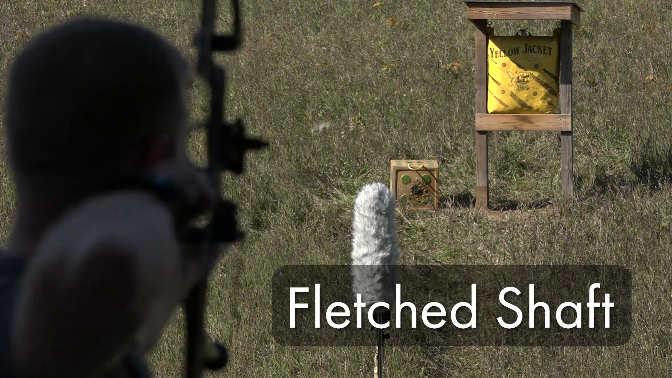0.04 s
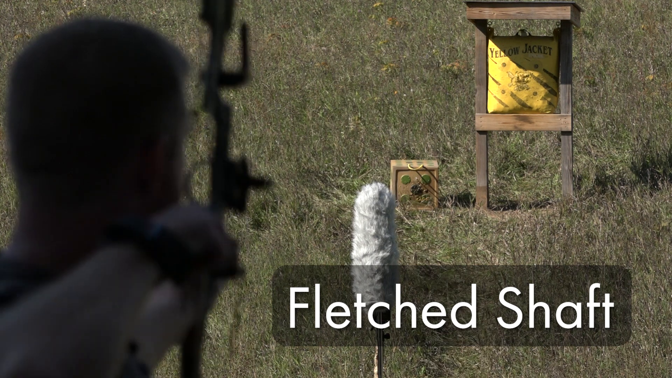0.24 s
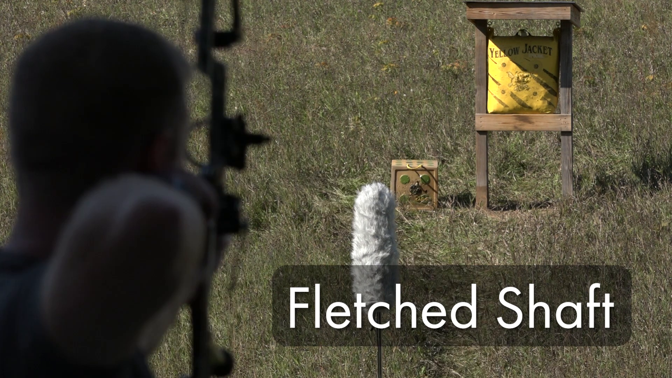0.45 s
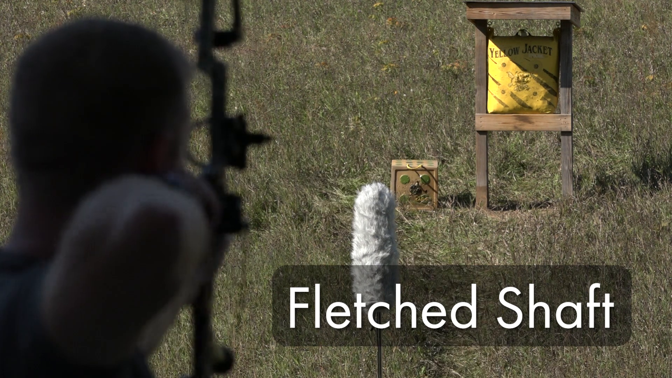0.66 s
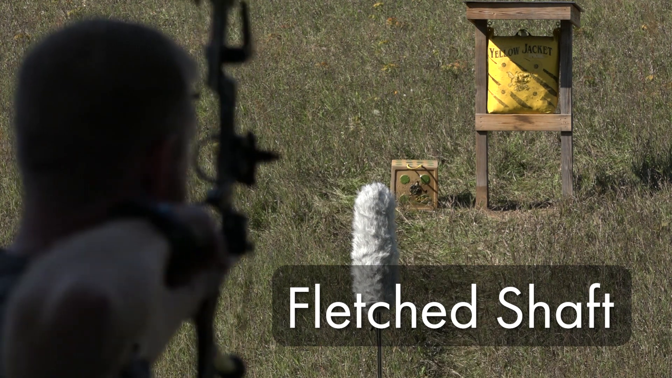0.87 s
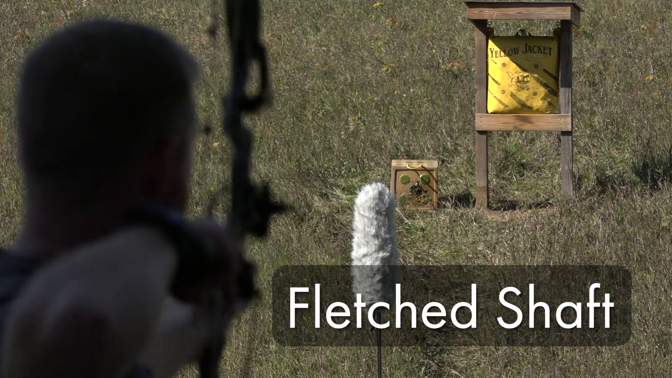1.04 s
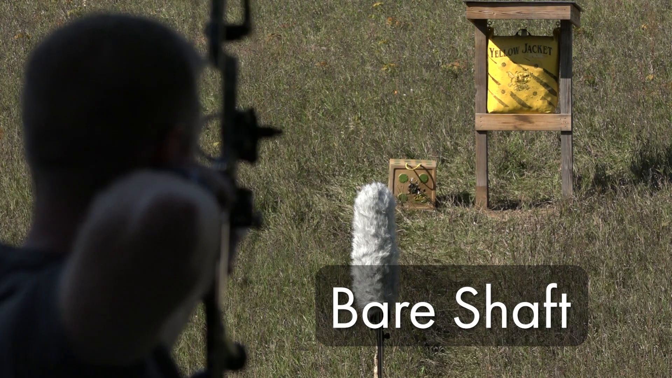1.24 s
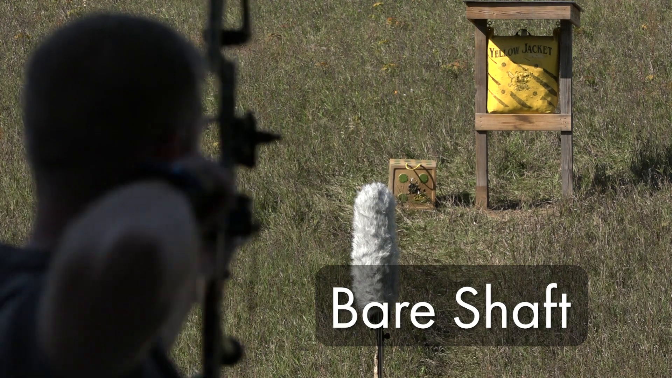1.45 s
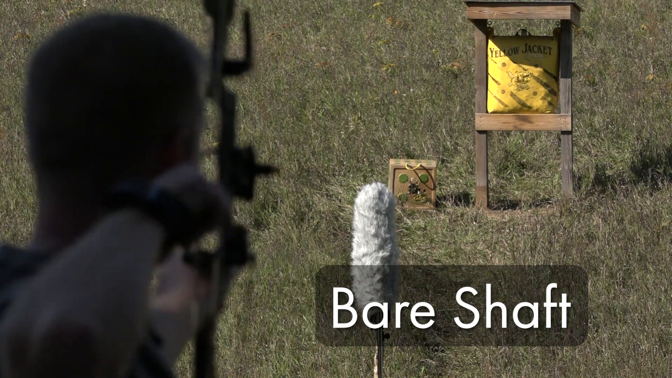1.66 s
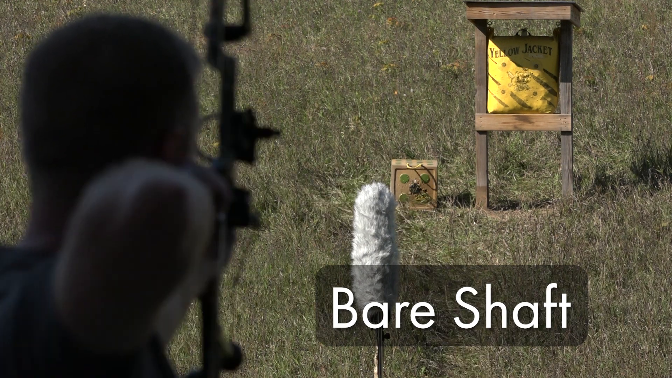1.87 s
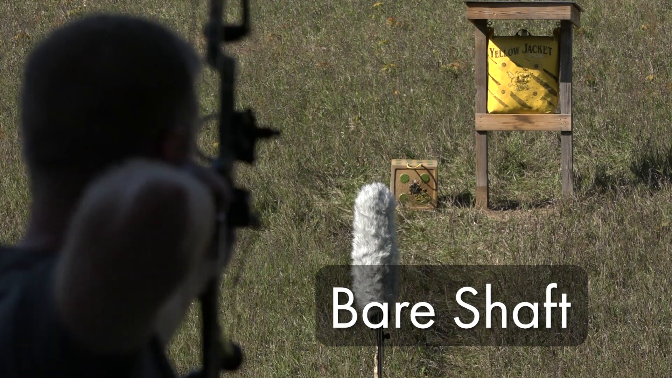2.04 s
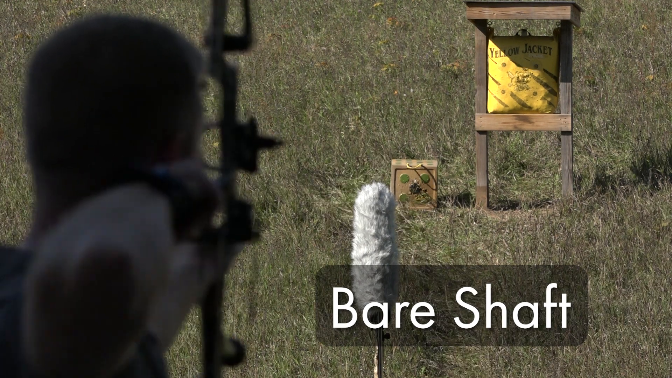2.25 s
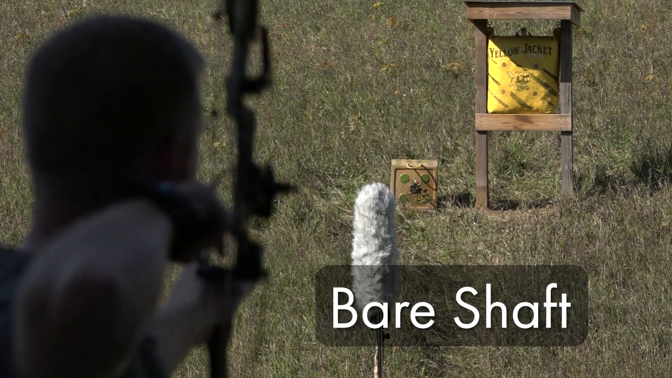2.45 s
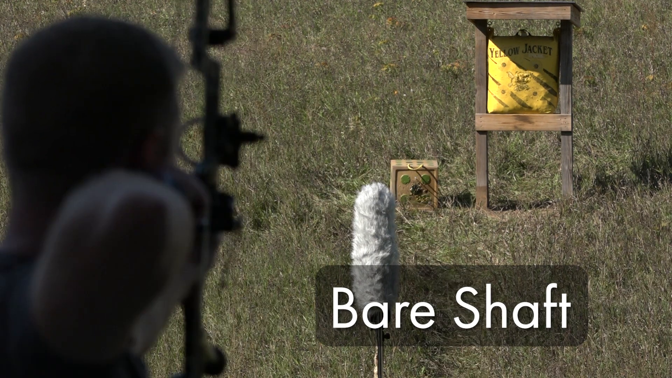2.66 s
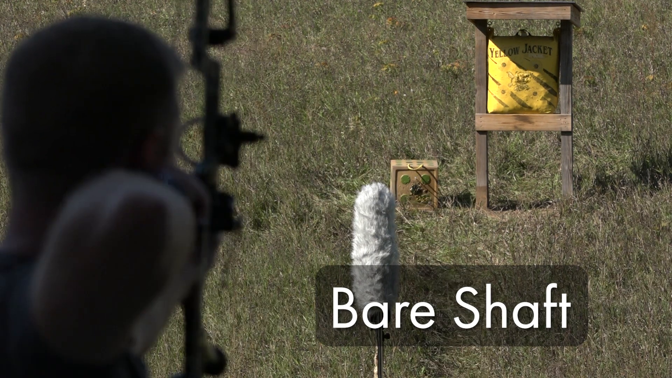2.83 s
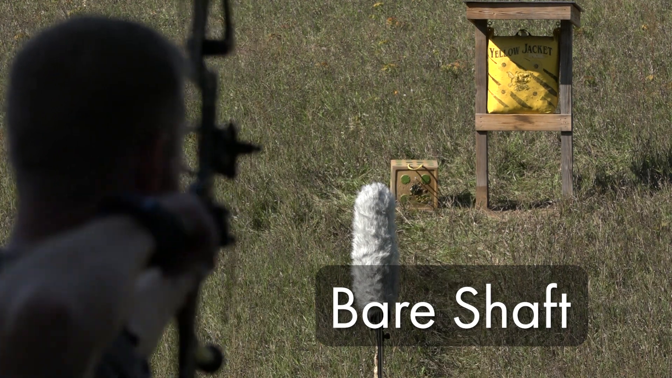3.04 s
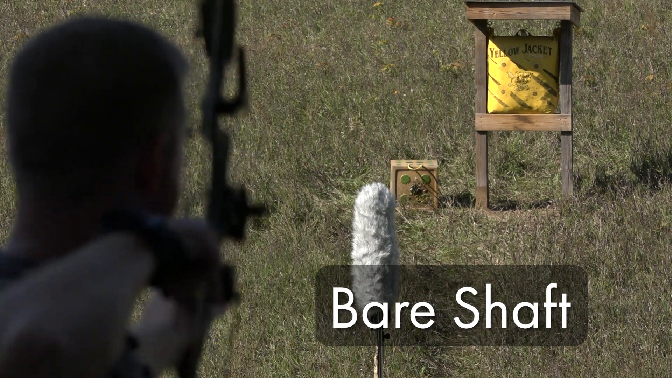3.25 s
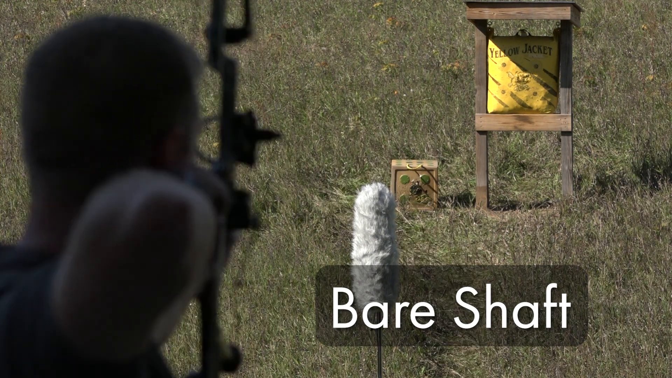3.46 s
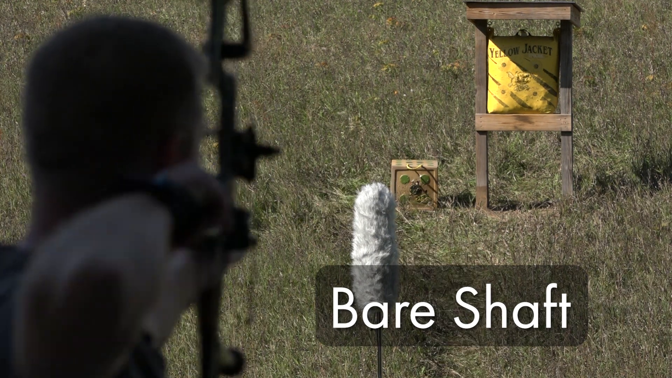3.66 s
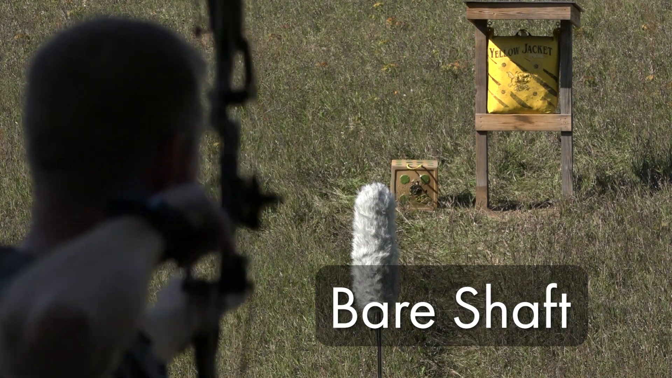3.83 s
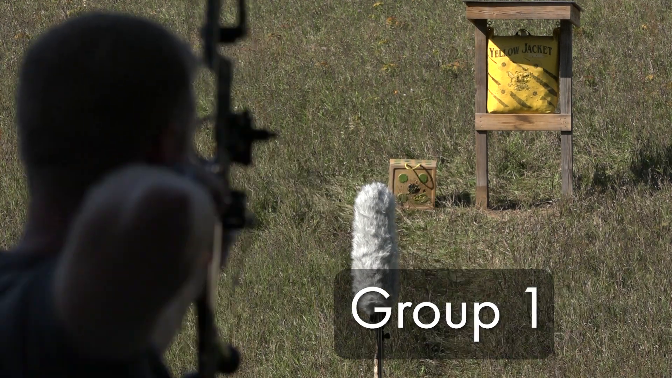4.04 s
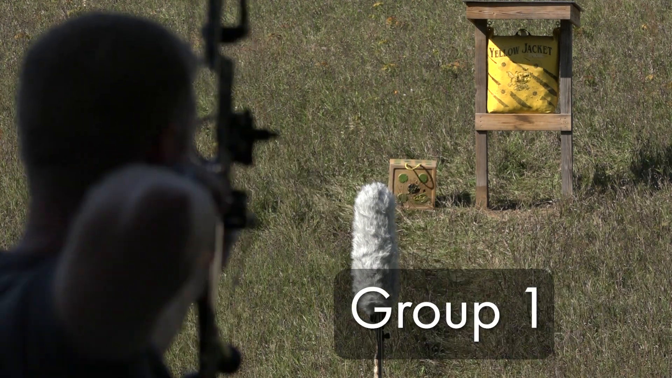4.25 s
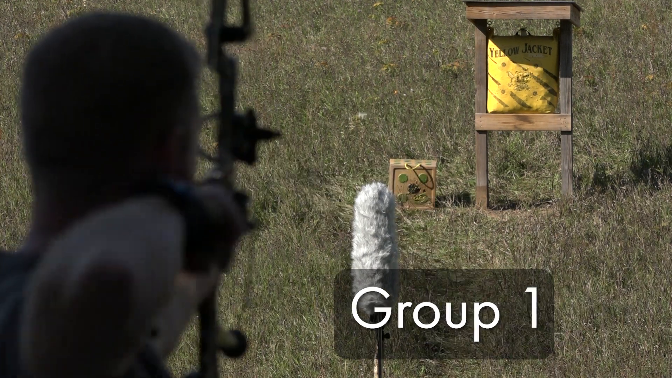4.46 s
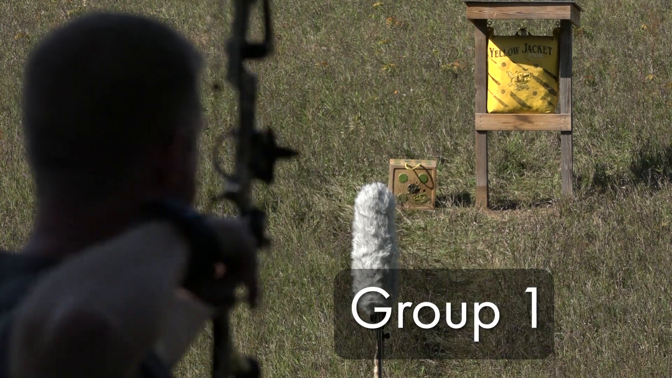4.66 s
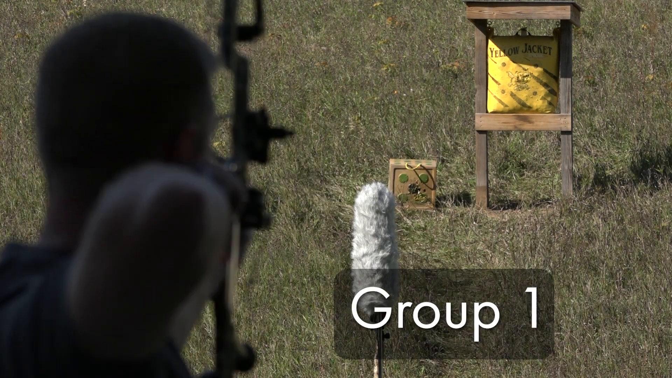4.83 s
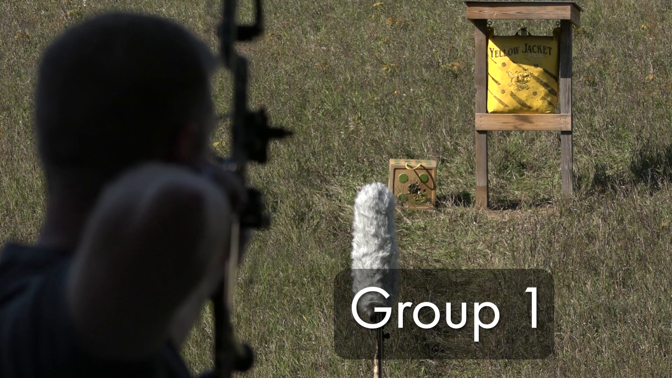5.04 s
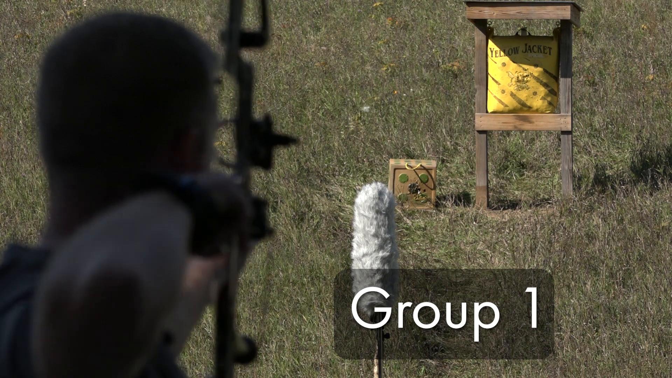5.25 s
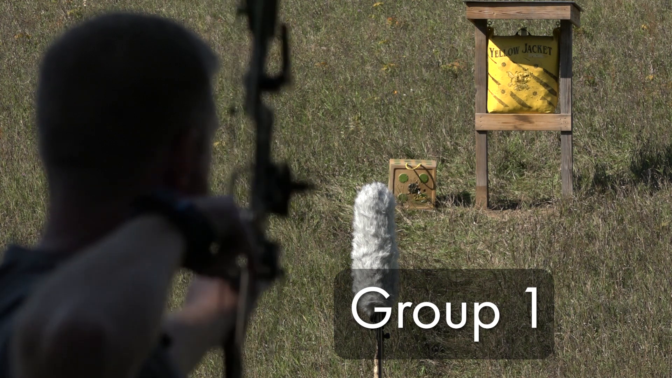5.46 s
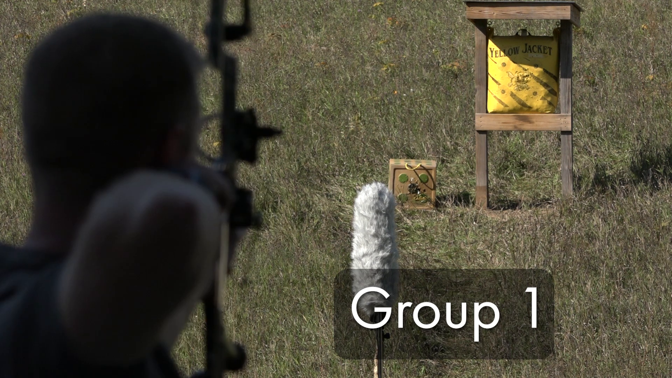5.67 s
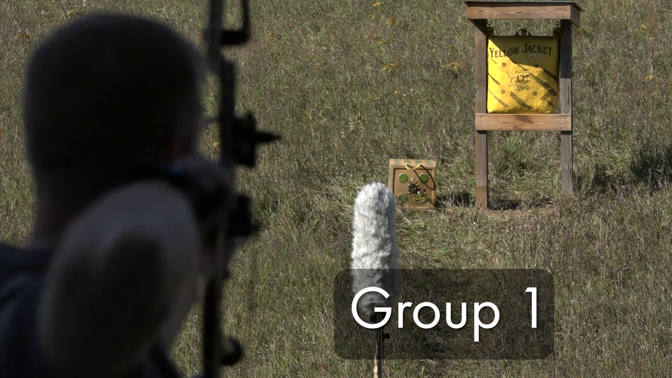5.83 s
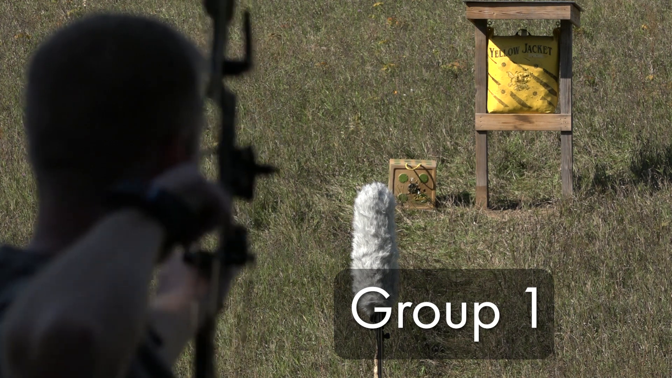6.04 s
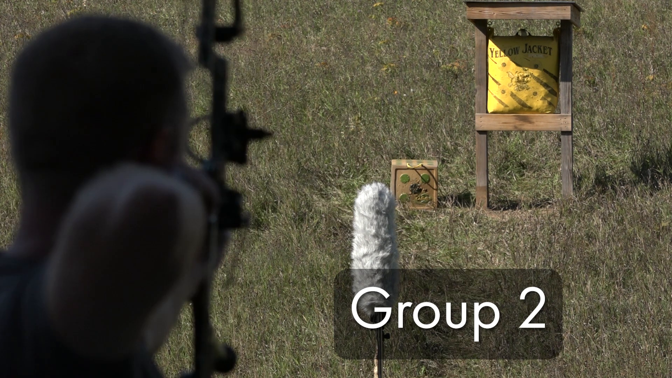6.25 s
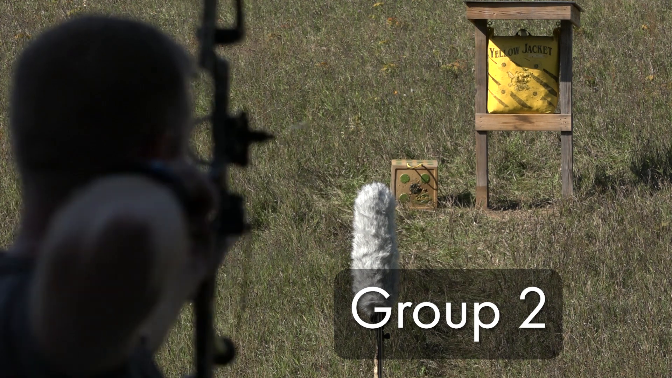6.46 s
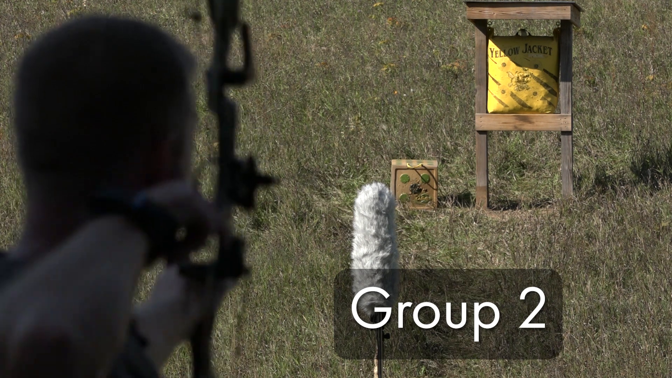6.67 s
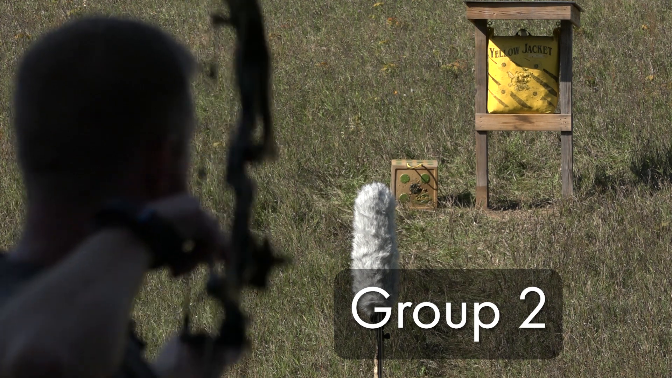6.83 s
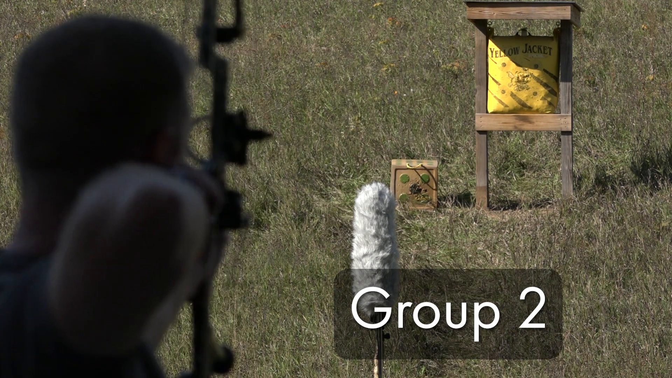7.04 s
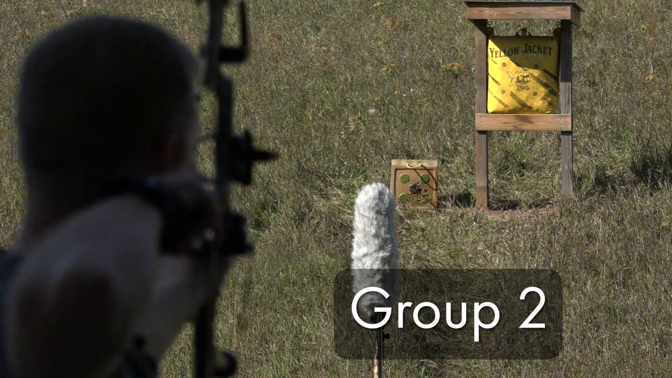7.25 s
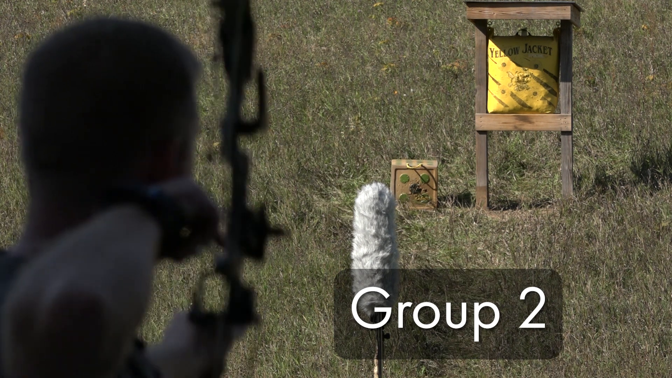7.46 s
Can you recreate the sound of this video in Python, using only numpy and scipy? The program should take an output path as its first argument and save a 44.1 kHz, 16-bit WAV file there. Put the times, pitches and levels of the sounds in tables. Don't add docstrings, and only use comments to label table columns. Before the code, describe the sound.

An outdoor meadow, dry and open, close fur-covered microphone. Tree crickets trill around 4.3 kHz and ground crickets pulse faster-sounding shimmer near 8 kHz throughout, with faint high bush-cricket buzzing in places, far hiss and low wind rumble. Bow shots land at about 0.06, 0.77, 1.5, 2.2, 3.0, 3.6, 4.4, 5.2, 5.9, 6.5 and 7.2 seconds: a tight snap, thud, metallic clack and short rattle. Each is followed about 0.16 seconds later by an arrow rushing past with a falling whistle, hiss and low air push. The first two are breathy; those from 1.7 to 3.8 are thinner and more whistling, as is 6.0; those at 4.6 and 6.7 hiss most sharply; 5.4 and 7.3 are breathy again. Faint bird chips and whistles appear around 2.5, 4.1, 5 and 6.4, with tiny grass ticks. The background changes suddenly between shots.

```python
import sys
import numpy as np
from scipy import signal
from scipy.fft import rfft, irfft
from scipy.io import wavfile
from scipy.ndimage import uniform_filter1d

SR = 44100
rng = np.random.default_rng(int(sys.argv[2]) if len(sys.argv) > 2 else 0)


def attenuation_scalar(level_db):
    decades = np.asarray(level_db, float) / 20
    return 10 ** decades


def inscribe(sig):
    pcm = np.round(np.clip(np.atleast_2d(sig).T, -1, 1) * 32767)
    wavfile.write(sys.argv[1], SR, pcm.astype(np.int16))


N = 330750
T = np.arange(N) / SR
SPEED_MS, SOUND_MS = 63, 343
SHAFT_S = .73 / SPEED_MS


def evened(x):
    return x / np.sqrt(np.mean(x ** 2) + 1e-20)


def noise(points, size):
    f, db = np.transpose(points)
    hz = np.fft.rfftfreq(size, 1 / SR)
    shape = attenuation_scalar(np.interp(np.log(hz + 1), np.log(f + 1), db))
    return evened(irfft(rfft(rng.standard_normal(size)) * shape, size))


def wander(size, order):
    return evened(uniform_filter1d(uniform_filter1d(rng.standard_normal(size), order), order))


def add(mix, s, sound):
    part = mix[round(s * SR):][:len(sound)]
    part += sound[:len(part)]


def ring(modes, t, detune, rise):
    u = np.maximum(t, 0)
    sines = sum(attenuation_scalar(db - 60 * u / t60) * np.sin(2 * np.pi * hz * detune * u) for hz, db, t60 in modes)
    return sines * (1 - np.exp(-(u / rise) ** 2))


# (frequency [Hz], level [dB])
SNAP_SPECTRUM = [(2500, -5), (4000, -11), (7000, -1), (10500, -8), (14500, -5), (17000, -7)]
# (delay [s], level [dB])
SNAPS = [
    (.0008, -11.5),
    (.0113, -18),
]


def string_cracks(out):
    n = np.arange(200)
    for s, db in SNAPS:
        burst = noise(SNAP_SPECTRUM, size=200) * np.exp(-n / 40) * np.minimum(n / 20, 1)
        add(out, s, attenuation_scalar(db) * burst)


# (frequency [Hz], level [dB], time to fall 60 dB [s])
LIMB_TONES = [(100.4, -3.5, 0.045), (332, -19, 0.21), (446, -5, 0.048), (588, -1, 0.028),
              (825, -11.5, 0.12), (1407, -15.5, 0.079)]
RISER_TONES = [(2340, -7, 0.013), (3137, 7.5, 0.0084), (3904, 4.5, 0.014), (4340, -63, 0.0043)]
CAM_TONES = [(7000, 7.5, 0.0046), (5400, -6.5, 0.0097)]
REST_TONES = [(9150, 3, 0.0059), (9690, 2.5, 0.0062), (12900, -19, 0.0079), (14600, -20, 0.0076)]
# (delay [s], limb thud [dB], riser clack [dB], cam [dB], arrow rest ping [dB])
BLOWS = [(.0003, -60, -1, 0, -40), (.0008, -22, -30, -14, -2), (.0018, .5, -11, -18, -16),
         (.004, -40, -6, -24, -18), (.0074, -6, -36, -26, -32), (.0098, -17.5, -5, -13, -1),
         (.0112, -40, -7, -12, -20), (.013, -8, -8, -16, -16), (.0146, -11, -5, -16, -21),
         (.0185, -9, -14, -20, -12), (.024, -11, -18, -24, -22), (.027, -13.5, -17, -22, -20),
         (.0443, -25, -16, -13, -2.5), (.052, -44, -25, -27, -18), (.056, -44, -25, -27, -20)]
THUD_SIGN = [1, 1, -1, 1, 1, -1, 1, -1, -1, 1, -1, 1, -1, 1, 1]


def bow_blows(out, luck):
    t = np.arange(7000) / SR
    short = t[:1200]
    thud = ring(LIMB_TONES, t, detune=.91, rise=.00026)
    for (s, limb_db, riser_db, cam_db, rest_db), sign, (slip, tune, db) in zip(BLOWS, THUD_SIGN, luck):
        tune = 1 + .015 * tune
        add(out, s + .0007, sign * attenuation_scalar(limb_db - 9) * thud)
        crack = attenuation_scalar(riser_db + .93 * db - 8.5) * ring(RISER_TONES, short, tune, rise=.00078)
        crack += attenuation_scalar(cam_db + 1) * ring(CAM_TONES, short, tune, rise=.001)
        crack += attenuation_scalar(rest_db - db - 4) * ring(REST_TONES, short, tune, rise=.0008)
        add(out, max(s - .0003 + .00012 * slip, 0), crack)


# (frequency [Hz], level [dB])
RATTLE_SPECTRUM = [(88, -38), (150, -3), (226, -1), (354, 0.5), (790, -3.5), (1060, -10), (2140, -12),
                   (3920, -5), (7920, -14.5), (9080, -11), (16000, -39)]


def release(peak_db, luck):
    t = np.arange(7000) / SR
    fall_s, loose_s = .25, .0095
    out = attenuation_scalar(-14 - 60 * t / fall_s + 1.7 * wander(size=len(t), order=40)) * noise(RATTLE_SPECTRUM, size=len(t))
    out *= 1 - np.exp(-t / .00015)
    out *= attenuation_scalar(-7 / (1 + np.exp((t - loose_s) / .00041)))
    bow_blows(out, luck)
    string_cracks(out)
    return attenuation_scalar(peak_db) * out


def string_rush():
    return attenuation_scalar(-56 + 5.6 * np.linspace(-1, 1, num=882)) * noise(RATTLE_SPECTRUM, size=882)


def heard(t, miss):
    grid = np.linspace(-.3, .3, num=3001)
    arrival = grid + (np.hypot(SPEED_MS * grid, miss) - miss) / SOUND_MS
    sent = np.interp(t, arrival, grid)
    far = np.hypot(SPEED_MS * sent, miss)
    return sent, miss / far, -SPEED_MS * sent / far


def nearness(t, miss, place):
    return heard(t - place * SHAFT_S, miss)[1]


def air_push(t, miss, push_db):
    parted = nearness(t, miss, .08) ** 1.24
    swell = nearness(t, miss * 1.47, -.45) ** 2
    wake = nearness(t, miss * 1.34, 1.1) ** 3.37
    return attenuation_scalar(push_db - 2) * wake - attenuation_scalar(push_db) * (parted - .49 * swell)


def vane_beat(t, miss, vane_db):
    near = nearness(t, miss * 2.13, 1.26) ** 3.7
    return attenuation_scalar(vane_db) * near * np.cos(2 * np.pi * 235 * (t - .404 * SHAFT_S))


# (frequency [Hz], level [dB])
POINT_SPECTRUM = [(180, -26), (300, -3), (787, -33), (2440, -9), (5700, -1.5), (6520, 3.5), (8220, 4.5),
                  (12700, -0.5), (16000, -4.5)]
TAIL_SPECTRUM = [(240, -8), (400, 1.5), (756, -2.5), (1400, -0.5), (2350, 0), (3300, -4.5), (10800, -4.5),
                 (15200, -29), (16400, -35)]


def hiss(t, miss, point_db, tail_db):
    clumps = attenuation_scalar(2.3 * wander(size=len(t), order=45))
    _, near, ahead = heard(t + .15 * SHAFT_S, miss * 1.5)
    out = attenuation_scalar(point_db) * near ** 2 * (1 + .23 * ahead) * noise(POINT_SPECTRUM, size=len(t))
    _, near, ahead = heard(t - .68 * SHAFT_S, miss * 1.3)
    out += attenuation_scalar(tail_db - 1.03) * near ** 1.87 * (1 + .045 * ahead) * noise(TAIL_SPECTRUM, size=len(t))
    return clumps * out


def whistle(t, miss, hz, db, place, reach, steep, forward, rough, slow):
    def chance():
        return wander(size=len(t), order=slow) + 1j * wander(size=len(t), order=slow)

    sent, near, ahead = heard(t - place * SHAFT_S, miss * reach)
    flutter = (1 + rough * chance()) / np.hypot(1, rough * np.sqrt(2))
    far = .017 * near ** .75 * (1 + .72 * ahead) * chance()
    level = attenuation_scalar(db) * flutter * (near ** steep + far) * (1 + forward * ahead)
    return (level * np.exp(2j * np.pi * hz * sent)).real


# (frequency [Hz], level [dB])
BENDING_TONES = [(240, -4), (484, -3.5), (776, -5), (1135, -18)]


def bending_shaft(t, miss, bend_db):
    sent, near, ahead = heard(t - .5 * SHAFT_S, miss * .64)
    bend = np.zeros(len(t))
    for hz, db in BENDING_TONES:
        level = attenuation_scalar(db + 1.55 * wander(size=len(t), order=500))
        bend += level * np.sin(2 * np.pi * (hz * sent + rng.random()))
    passing = heard(t + .059 * SHAFT_S, miss * 2.12)[1] ** 1.84 + .084 * near ** .33
    return attenuation_scalar(bend_db) * passing * ((1 + ahead) / 2) ** .93 * bend


KINDS = {"vaned": (-14, -32, -23, -30.5, -34.5), "bare": (-12.5, -34, -34.5, -40.5, -35.5),
         "bladed": (-12, -14, -19.5, -28.5, -33.5)}


def arrow(s, kind, miss, low_hz, low_db, bend_db, start, wake_db):
    push_db, point_db, tail_db, vane_db, high_db = KINDS[kind]
    t = np.arange(start - s, .22, 1 / SR)
    out = hiss(t, miss, point_db, tail_db + wake_db)
    out += air_push(t, miss, push_db)
    out += vane_beat(t, miss, vane_db)
    out += whistle(t, miss, low_hz, low_db, place=.88, reach=1.45, steep=2.5, forward=.1, rough=.45, slow=95)
    out += whistle(t, miss, 4750, high_db, place=.72, reach=.9, steep=.9, forward=.92, rough=1.5, slow=60)
    out += bending_shaft(t, miss, bend_db)
    return out * np.minimum(np.arange(len(t)) / 800, 1) * np.clip((.22 - t) / .018, 0, 1)


# (time [s], peak level [dB])
RELEASES = [(.064, -17), (.7715, -16.5), (1.492, -16), (2.214, -17), (2.9619, -16), (3.646, -17.5),
            (4.431, -17.5), (5.2094, -17), (5.8714, -16), (6.5083, -16), (7.1703, -17)]
# (time [s], kind, miss distance [m], nock whistle at rest [Hz], its level [dB], bending level [dB])
PASSES = [(.2283, "vaned", .21, 2410, -25.5, -33), (.9354, "vaned", .24, 2444, -30, -33.5),
          (1.656, "bare", .28, 2480, -23.5, -29), (2.3777, "bare", .3, 2380, -27.5, -33),
          (3.1263, "bare", .26, 2540, -47, -33.5), (3.8096, "bare", .27, 2396, -23.5, -30.5),
          (4.5957, "bladed", .24, 2450, -30.5, -33), (5.3737, "vaned", .24, 2370, -29.5, -35),
          (6.0354, "bare", .27, 2470, -24, -29.5), (6.6726, "bladed", .24, 2505, -32, -34),
          (7.3342, "vaned", .24, 2470, -32.5, -40.5)]
WAKE_DB = [-1.5, 0.1, 0.8, 1, 1, -0.5, 0.5, -1.3, 2.5, -1, 0]


def shots():
    out = np.zeros(N)
    luck = rng.standard_normal((len(RELEASES), len(BLOWS), 3))
    for (s, peak_db), flight, chance, wake_db in zip(RELEASES, PASSES, luck, WAKE_DB):
        add(out, s - .02, string_rush())
        add(out, s, release(peak_db, chance))
        add(out, s, arrow(*flight, s, wake_db))
    return out


TAKES = [0, .4681, 1.2189, 1.9279, 2.637, 3.346, 4.0551, 4.806, 5.598, 6.3073, 6.9329]
MOMENT = [0, 1, 2, 3, 4, 5, 6, 7, 2, 8, 9]


def by_take(rows):
    take = np.searchsorted(TAKES, T, "right") - 1
    hz, rate, first, db = np.array(rows)[MOMENT][take].T
    turns = (T - np.array(TAKES)[take]) * rate - first + 2.5
    return hz, turns % 1, turns.astype(int), db


def now_and_then(hz, rate, rest_db, sing_db, sings):
    return [(hz, rate, rng.random(), sing_db if k in sings else rest_db) for k in range(max(MOMENT) + 1)]


def cricket(rows, duty, glide, arch, uneven_db, wet, late=0, octave_db=-60):
    hz, place, stroke, db = by_take(np.array(rows) + [0, 0, late, 0])
    u = np.clip((place - .5) / np.clip(duty, .1, 1), -.5, .5)
    luck = rng.standard_normal((400, 2))[stroke]
    hz = hz * (1 - glide * u + arch * (.25 - 4 * u ** 2) + .0029 * uneven_db * luck[:, 0])
    turns = np.cumsum(hz) / SR
    tone = np.sin(2 * np.pi * turns) + attenuation_scalar(octave_db) * np.sin(4 * np.pi * turns)
    pulses = np.cos(np.pi * u) ** 1.1 * attenuation_scalar(uneven_db * luck[:, 1]) * tone
    echo = rng.standard_normal(2000) * np.exp(-np.arange(2000) / 600)
    scattered = signal.oaconvolve(pulses, echo)[:N]
    return attenuation_scalar(db) * evened(evened(pulses) + wet * evened(scattered))


# (frequency [Hz], pulse rate [1/s], first pulse [turns], level [dB])
NEAR_TREE = [(4320, 47.5, .16, -54), (4410, 50.4, .26, -52), (4370, 50.25, .79, -62),
             (4320, 47.15, .7, -57.5), (4310, 47.65, 1., -55), (4430, 50.9, .86, -54),
             (4350, 52.2, .72, -63), (4320, 52., .15, -63), (4350, 48.75, .32, -57), (4340, 48.5, .12, -57)]
FAR_LOW = [(2960, 49, .1, -86), (3020, 48.2, .22, -72), (2960, 49.55, .37, -72), (2960, 49, .5, -86),
           (2960, 49, .3, -88), (3050, 51.15, .5, -76), (2960, 48.95, .6, -71), (2960, 50.65, .64, -73),
           (3070, 44.6, .65, -70), (2960, 49, .2, -86)]
FAR_MID = [(3440, 46, .2, -80), (3440, 45.8, .67, -71.5), (3440, 44.1, .66, -77), (3560, 44.8, .68, -73),
           (3440, 46, .3, -84), (3440, 46.05, .09, -69.5), (3440, 43, .74, -78), (3440, 46, .5, -79),
           (3440, 46, .2, -72), (3400, 48.15, .48, -70)]
MATE_AHEAD = [.3, .3, .3, .3, 0, .3, .3, .3, .3, .3]


def tree_crickets():
    mate = []
    for k, (hz, rate, first, db) in enumerate(NEAR_TREE):
        softer_db = -8 if k in (0, 1, 4, 5) else -19
        mate.append((4250, rate - 3, first - MATE_AHEAD[k], db + softer_db))
    far_high = now_and_then(5020, 50.2, rest_db=-84, sing_db=-67.5, sings=(1,))
    out = np.zeros(N)
    for rows in NEAR_TREE, mate, far_high:
        out += cricket(rows, duty=.66, glide=.075, arch=0, uneven_db=1.3, wet=.4)
    for rows in FAR_LOW, FAR_MID:
        out += cricket(rows, duty=.75, glide=.13, arch=0, uneven_db=1, wet=.12)
    return out


# (frequency [Hz], pulse rate [1/s], first pulse [turns], level [dB])
LOW_GROUND = [(7770, 17.9, .35, -62), (7690, 18.9, .65, -63), (7550, 19.15, .18, -62),
              (7660, 16.05, .43, -55), (7680, 16.7, .78, -60), (7680, 17.65, .41, -63),
              (7640, 18.2, .1, -65), (7600, 19.6, .65, -62), (7720, 17.2, .58, -54), (7690, 17.3, .02, -54)]
MID_GROUND = [(8150, 18.85, .56, -60), (8130, 16.95, .73, -62), (8170, 18.85, .75, -61),
              (7980, 17.1, .23, -55), (8020, 16.7, .74, -58), (8130, 19.3, .44, -59),
              (8100, 18.15, .12, -63), (8130, 18.45, .41, -60), (7940, 17.1, .3, -59), (7990, 17., .5, -57)]
HIGH_GROUND = [(8640, 18.85, .54, -51), (8410, 17.45, .01, -57), (8500, 18.6, .52, -55),
               (8340, 18.45, .07, -55), (8400, 19.85, .36, -59), (8450, 17.55, .28, -56),
               (8550, 19.15, .41, -56), (8520, 18.45, .39, -55), (8440, 18.05, .83, -57),
               (8400, 21., .66, -56)]
DEEP_GROUND = [(6750, 14.3, .56, -65), (6950, 14.15, .25, -71), (6900, 14, .49, -64),
               (6750, 16.95, .58, -68), (6850, 14.85, .16, -66), (6900, 15.45, .21, -75),
               (6900, 15.95, .53, -68), (6950, 19.35, .59, -70), (6950, 14.55, .66, -68),
               (6900, 16.25, .71, -68)]
# (frequency [Hz], pulse rate [1/s], level [dB])
CROWD = [(7400, 15, -69), (8250, 20.3, -64), (8700, 16.4, -64), (7950, 14.2, -65)]
TINY_FIRST = [.85, .58, .5, .73, .2, .3, .4, .5, .75, .87]


def ground_crickets():
    over = [(hz * 1.03, rate, first - .02, db - 9) for hz, rate, first, db in HIGH_GROUND]
    out = np.zeros(N)
    for rows, arch, wet in (LOW_GROUND, .09, .3), (MID_GROUND, .085, .4), (HIGH_GROUND, .07, .5), (over, .06, .4):
        out += cricket(rows, duty=.4, glide=arch / 2, arch=arch, uneven_db=1.8, wet=wet, octave_db=-32)
    for rows in MID_GROUND, HIGH_GROUND:
        out += attenuation_scalar(-11) * cricket(rows, duty=.46, glide=.03, arch=.055, uneven_db=3, wet=.5, late=.5)
    out += cricket(DEEP_GROUND, duty=.3, glide=.1, arch=.04, uneven_db=2.5, wet=.4)
    top = now_and_then(9080, 18.2, rest_db=-85, sing_db=-61, sings=(6, 7))
    top = [(hz, rate, .87, db) for hz, rate, _, db in top]
    out += cricket(top, duty=.36, glide=0, arch=.05, uneven_db=1.5, wet=.2)
    tiny = [(14500, 18.7, first, -86) for first in TINY_FIRST]
    out += cricket(tiny, duty=.2, glide=.06, arch=0, uneven_db=1.5, wet=.5)
    for hz, rate, db in CROWD:
        rows = now_and_then(hz, rate, db, db, ())
        out += cricket(rows, duty=.45, glide=.06, arch=.08, uneven_db=3, wet=.6)
    return out


def bush_cricket():
    rows = now_and_then(0, 101.7, rest_db=-81, sing_db=-62, sings=(2, 6, 7))
    _, place, _, db = by_take(rows)
    wing = [(11600, -30), (12200, -11), (13000, -7), (13700, -15), (14500, -1), (15300, 0), (16100, -12)]  # (Hz, dB)
    stroke = .35 + np.exp(-((place - .5) / .14) ** 2)
    return attenuation_scalar(db) * evened(stroke * noise(wing, size=N))


def bird(length, start_hz, middle_hz, end_hz, db):
    u = np.linspace(-1, 1, round(length * SR))
    hz = middle_hz + u * (end_hz - start_hz) / 2 + u ** 2 * ((start_hz + end_hz) / 2 - middle_hz)
    flutter = wander(size=len(u), order=150)
    tone = np.sin(2 * np.pi * np.cumsum(hz + 51 * flutter) / SR)
    return attenuation_scalar(db + 9.5 + 3.1 * flutter) * tone * np.sqrt(1 - u ** 2)


# (time [s], top frequency [Hz], level [dB])
CHIPS = [(3.534, 5170, -77), (3.577, 5200, -73), (3.61, 5400, -71), (4.06, 5200, -68), (4.103, 5200, -67),
         (4.155, 5140, -75), (4.197, 5260, -72), (4.395, 5050, -71), (4.81, 5000, -69), (4.854, 5240, -70),
         (4.894, 5200, -72), (5.175, 5160, -67), (5.69, 6150, -74)]
# (time [s], middle frequency [Hz], sweep [share of the pitch], level [dB])
SWOOPS = [(2.088, 5450, -.07, -65), (2.597, 5000, -.03, -68), (2.652, 5560, -.1, -60),
          (2.641, 5500, -.08, -68), (2.648, 6700, -.06, -64), (2.652, 11100, -.06, -70),
          (4.977, 5600, .2, -62)]
# (time [s], length [s], middle frequency [Hz], sweep [Hz], level [dB])
WHISTLES = [(1.466, 0.026, 1830, 0, -77), (1.9, 0.028, 2840, -250, -78), (1.925, 0.045, 3750, -100, -79),
            (2.395, 0.08, 3820, -80, -69), (2.44, .09, 3680, -50, -74), (2.515, 0.123, 3950, -110, -64.5),
            (4.85, 0.033, 6230, -300, -67), (4.905, 0.025, 6870, -140, -62), (5.033, 0.054, 4030, 112, -64),
            (6.309, .1, 3150, 130, -64), (6.395, .035, 3060, 60, -63), (6.44, 0.045, 2930, -50, -65),
            (6.41, .1, 3150, 0, -69), (6.33, 0.17, 3480, 0, -68), (6.395, 0.06, 3800, -80, -69),
            (6.33, .13, 2350, -200, -78), (6.56, .372, 2800, 0, -73), (6.74, .19, 3300, -150, -75),
            (6.42, .08, 5770, -200, -78), (6.932, 0.08, 5850, -50, -80)]


def birds():
    out = np.zeros(N)
    for s, hz, db in CHIPS:
        add(out, s, bird(.02, .955 * hz, hz, .955 * hz, db))
    swoops = [(s, .0054, hz, hz * share, db) for s, hz, share, db in SWOOPS]
    for s, length, hz, sweep_hz, db in WHISTLES + swoops:
        add(out, s, bird(length, hz - sweep_hz / 2, hz, hz + sweep_hz / 2, db))
    echo = rng.standard_normal(3000) * np.exp(-np.arange(3000) / 900)
    return out + attenuation_scalar(-6) * signal.oaconvolve(out, echo / np.linalg.norm(echo))[:N]


# (time [s], peak level [dB])
TICKS = [(0.4515, -20), (0.8712, -24), (1.9295, -36), (3.4184, -33), (3.9094, -32), (4.7515, -22),
         (5.15, -25)]


def grass_ticks():
    out = np.zeros(N)
    for s, db in TICKS:
        click = np.diff(rng.standard_normal(81)) * np.exp(-np.arange(80) / 3.7)
        add(out, s, attenuation_scalar(db - 8.5) * click)
    return out


# (frequency [Hz], level [dB])
WIND_SPECTRUM = [(8.8, -25), (15, 11.5), (25, -4), (38, -3.5), (64, -1.5), (81, -9.5), (108, -11.5),
                 (157, -22), (190, -23), (400, -59), (520, -63), (880, -120)]
# (frequency [Hz], level [dB])
AIR_SPECTRUM = [(100, -10), (170, -4.5), (700, -15), (2300, -28.5), (3400, -20), (6200, -29), (7200, -14),
                (8300, -15), (8900, -16), (9250, -26), (13000, -35), (16000, -29), (16600, -60)]
# (time [s], rumble level [dB], far hiss level [dB])
GUSTS = [
    (0.0, -53.5, 3),
    (0.29, -46.5, 4.5),
    (2.38, -48.5, 6),
    (7.12, -49, 5.5),
    (7.5, -48, 6),
]
HAZE_DB = [0.65, 0.63, -0.19, -2.2, -2.1, -1.3, -1.3, -0.069, -0.6, -1.9]
# (time [s], height [full scale])
JUMPS = [(0.469, 0.0026), (1.22, -0.0028), (1.927, -0.004), (2.639, .0124), (3.345, -0.0032),
         (4.055, 0.017), (6.309, -0.012), (6.932, -0.013)]


def wind():
    s, rumble_db, hiss_db = np.transpose(GUSTS)
    rumble_db = np.interp(T, s, rumble_db) + 4 + 2.44 * wander(size=N, order=2500)
    out = attenuation_scalar(rumble_db) * noise(WIND_SPECTRUM, size=N)
    haze_db = by_take([(0, 1, 0, db) for db in HAZE_DB])[3]
    hiss_db = np.interp(T, s, hiss_db) - 63.5 + haze_db + .87 * wander(size=N, order=500)
    out += attenuation_scalar(hiss_db) * noise(AIR_SPECTRUM, size=N)
    for s, height in JUMPS:
        out += height / 2 * np.sign(T - s) * np.exp(-abs(T - s) / .0098)
    return out


def scene():
    out = shots()
    out += tree_crickets() + ground_crickets() + bush_cricket()
    out += birds() + grass_ticks() + wind()
    return out[None]


def roll_off(x):
    return signal.sosfilt(signal.butter(12, 16660, fs=SR, output="sos"), x)


def record(dry):
    x = signal.lfilter(*signal.butter(2, 17.6 / SR * 2, "high"), dry)
    x = signal.oaconvolve(x, signal.firwin(511, 15800, fs=SR)[None], "same")
    return roll_off(x)


dry = scene()
out = record(dry)
inscribe(out)
```